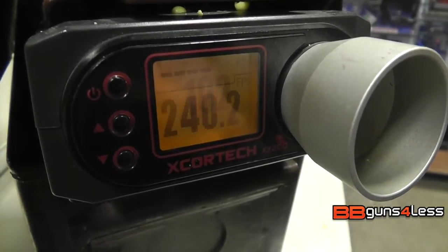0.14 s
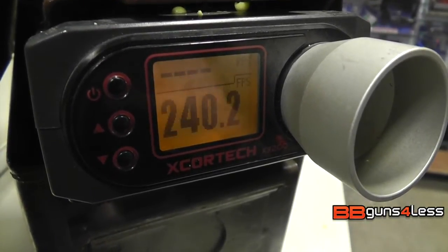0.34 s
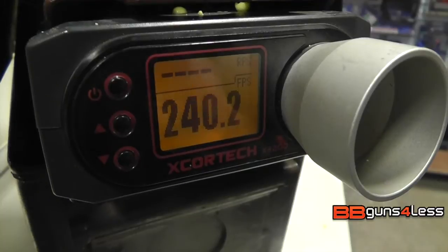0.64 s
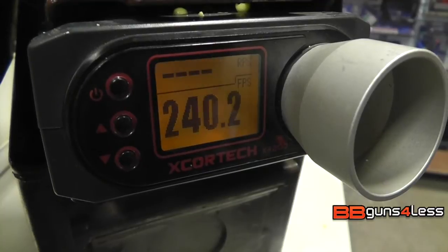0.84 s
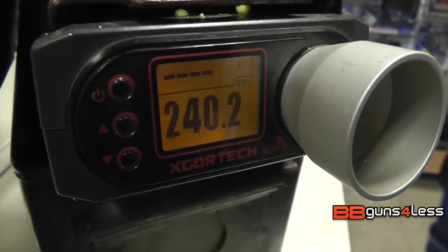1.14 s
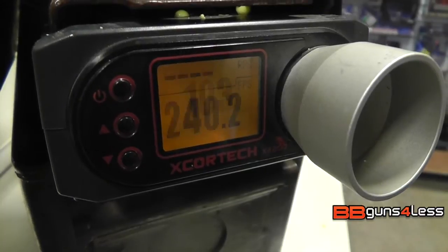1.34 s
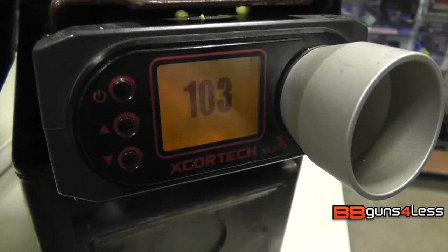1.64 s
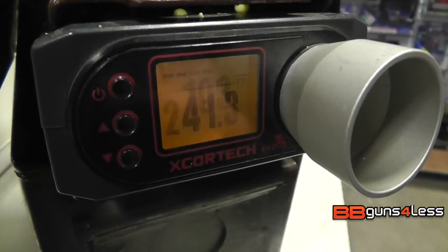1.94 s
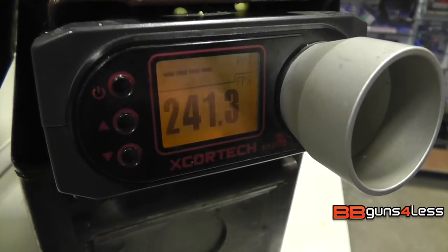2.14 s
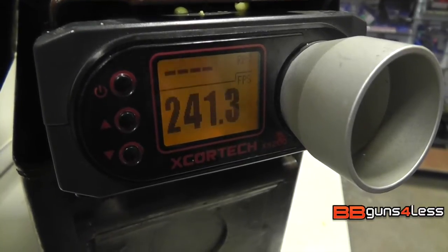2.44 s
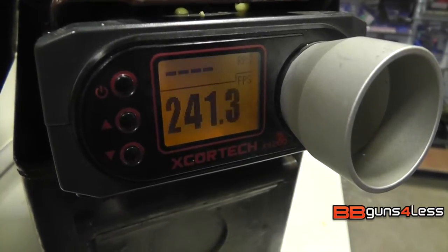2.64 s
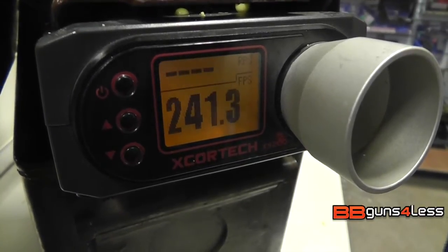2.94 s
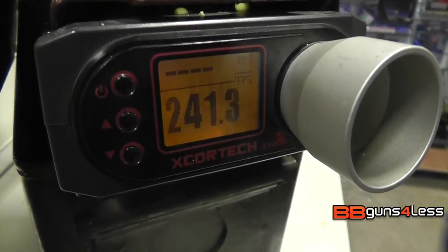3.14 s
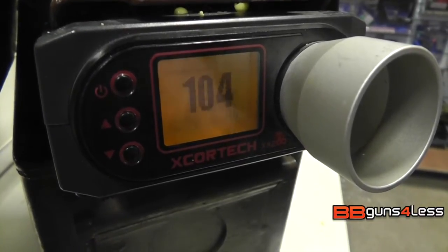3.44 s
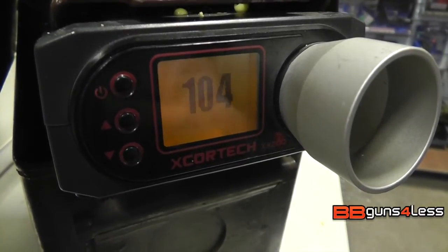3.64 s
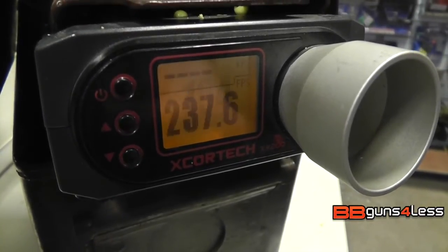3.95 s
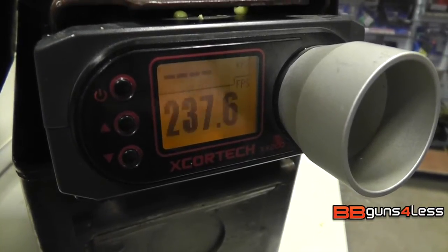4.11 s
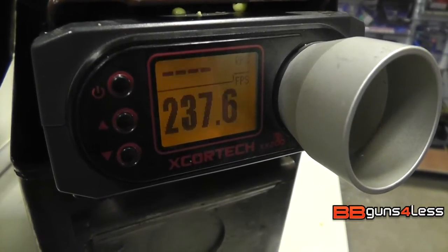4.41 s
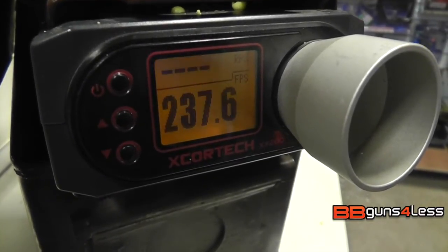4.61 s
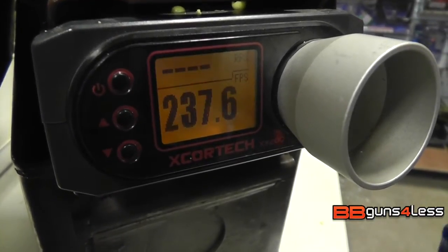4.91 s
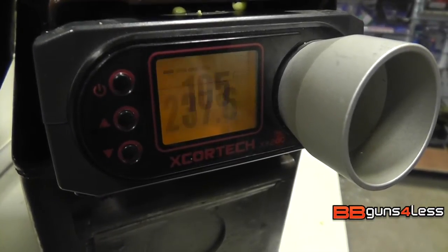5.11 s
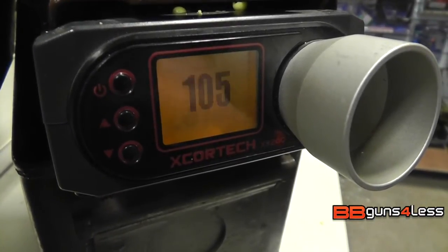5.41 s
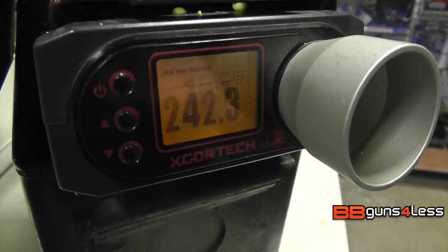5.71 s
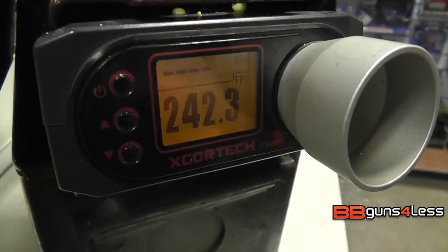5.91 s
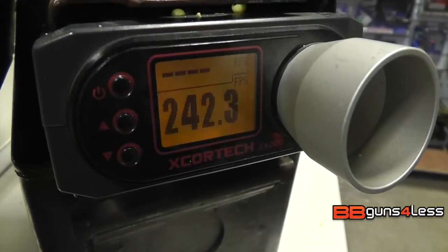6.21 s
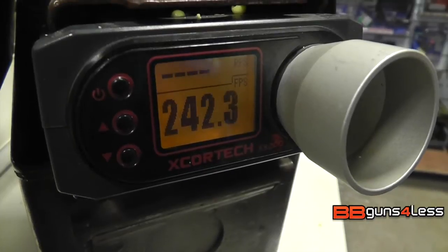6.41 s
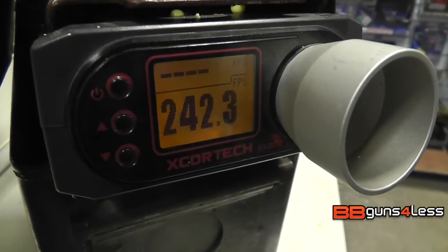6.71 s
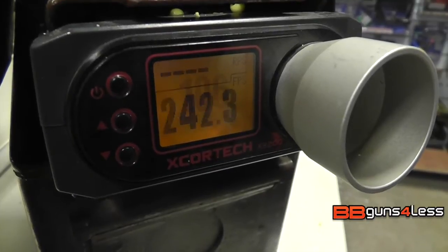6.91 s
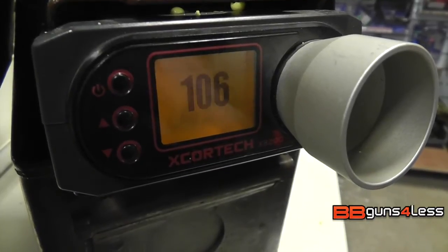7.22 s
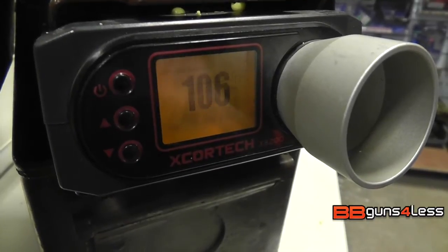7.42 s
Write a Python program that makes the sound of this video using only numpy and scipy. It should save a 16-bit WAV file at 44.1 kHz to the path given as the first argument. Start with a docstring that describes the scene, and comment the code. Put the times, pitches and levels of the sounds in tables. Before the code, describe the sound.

Four cycles of rasping slide, knock, slam and sharp air pistol crack, with small clicks, cloth rustle and faint ventilation rumble in a big room.

```python
"""Four sharp snaps of a spring air pistol, each after a rasp, a knock and a slam of its slide, in a large shop.
The pistol fires close to the microphone into a speed meter's funnel, which rings with each puff of air.
Shaped noise makes the rasps, blows and rustles; damped sines make the funnel's ring and the low thumps.
Between shots hands click on plastic and sleeves rustle; the hall answers and ventilation rumbles behind.
The recorder's gain drops at each loud blow and creeps back, uncovering the hall's tail."""
import sys
import numpy as np
from scipy import signal
from scipy.fft import rfft, irfft, next_fast_len
from scipy.io import wavfile
from scipy.ndimage import uniform_filter1d

SR = 44100
rng = np.random.default_rng(int(sys.argv[2]) if len(sys.argv) > 2 else 0)


def unload_wav(signal):
    """Save mono or channel-first audio to the path in sys.argv[1] as 16-bit WAV at rate SR, clipped to [-1, 1]."""
    wavfile.write(
        sys.argv[1],
        SR,
        np.round(np.clip(np.atleast_2d(signal).T, -1, 1) * 32767).astype(np.int16),
    )


N = 333396
TIME = np.arange(N) / SR
CATCH_GAP_S = .009  # three catches snap over in a row
AIR_DB = -54
CUTOFF_HZ = 16000

# Shots: (time [s], level [dB], air puff re level [dB])
SHOT_EVENTS = [(1.2736, 7, 0), (3.1307, 7, -2.5), (4.9472, 7.5, -5), (6.8389, 5, -12)]
# The slide unlatches: (time [s], level [dB])
UNLATCH_EVENTS = [(.213, -18), (2.0025, -30), (3.884, -34.5), (5.6874, -15.5)]
# The slide starts to rasp back towards its stop: (time [s], level [dB])
RASP_STARTS = [(.214, -28.5), (2.036, -29), (3.916, -27.5), (5.687, -29)]
# First of a run of catches as the piston engages: (time [s], level [dB])
CATCH_EVENTS = [(.2525, -21.5), (2.053, -20), (3.9332, -19), (5.722, -18)]
# The slide hits its back stop: (time [s], level [dB], pitch of the compressed spring [Hz])
STOP_EVENTS = [(.2875, -10, 2750), (2.097, -10.5, 3270), (3.958, -7.5, 2610), (5.7379, -9.5, 3190)]
# The slide slams home: (time [s], level [dB])
SLAM_EVENTS = [(0.4312, -11.5), (2.2135, -11.5), (4.102, -11), (5.8755, -11.5)]
# The hand lets go of the slide after each slam: (time [s], level [dB])
RELEASE_EVENTS = [(.796, -42), (2.585, -29), (4.4565, -31.5), (6.2265, -40.5)]
# The trigger takes up just before each shot: (time [s], level [dB])
TRIGGER_EVENTS = [(1.2432, -37), (3.104, -40), (3.115, -44), (4.928, -42), (6.821, -48.5)]
# Hard ticks, mostly of the pellet bouncing about after a shot:
# (time [s], level [dB], treble re level before an offset [dB])
TICK_EVENTS = [(1.538, -33, -19), (1.665, -37, -34), (3.2697, -21, 2), (3.382, -33, 10.5),
               (3.394, -26, -24), (3.498, -41, 5), (3.666, -29.5, 0), (6.275, -44.5, -5), (7.092, -33, 5.5),
               (7.115, -29.5, -29), (7.129, -32, -3), (7.142, -32, 6.5), (7.288, -39, -1)]
# Dull knocks of the hands on the plastic: (time [s], level [dB])
KNOCK_EVENTS = [(1.606, -43), (1.691, -52), (1.724, -43), (3.072, -43.5), (3.665, -36), (5.221, -34),
                (5.311, -31), (5.378, -36), (5.506, -33.5), (5.551, -45), (7.1675, -30), (7.416, -45)]
# Sleeves shift as the hands change grip: (time [s], half length [s], level [dB])
SLEEVE_RUSTLES = [(.058, 0.12, -45), (1.04, 0.14, -53.5), (1.88, 0.13, -47), (3.8, 0.22, -52.5),
                  (5.583, 0.054, -50.5), (6.355, .025, -54.5), (7.445, 0.042, -47)]
# Low echoes from the far walls: (delay [s], level after a shot [dB], level after a slam [dB])
WALL_ECHOES = [(.056, -32, -41.5), (0.139, -40, -65), (.202, -51, -51)]

# Funnel modes struck by the puff: (frequency [Hz], t60 [s], level [dB], right side [dB], right side lag [s])
FUNNEL_PUFF_MODES = [(338, .03, -12.5, 1.5, 0.00056), (430, 0.033, -19.5, -2, 0.0092),
                     (640, .035, -18, -1.5, 0.0059), (810, 0.027, -22, 1, 0.007),
                     (1120, .025, -14.5, -4.5, 0), (1480, 0.034, -1, 6, 0)]
# Low modes of a thump: (frequency [Hz], t60 [s], level [dB], right side [dB], right side lag [s])
LOW_THUMP_MODES = [(90, 0.017, 1.5, 0, 0.0013), (220, 0.016, -1, 1.5, 0.000084)]
# Broad resonances of the funnel: (frequency [Hz], width [Hz], level [dB])
FUNNEL_RESONANCES = [(1000, 140, 1), (1320, 330, 0), (2230, 280, 3), (2650, 160, -1.5), (3990, 150, 7),
                     (5870, 200, 7), (7800, 250, -3)]
# Resonances and hollows of the slide and body: (frequency [Hz], width [Hz], level [dB])
SLIDE_RESONANCES = [(660, 87, 0.5), (956, 64, 3), (1135, 170, 3.5), (1410, 140, 0.5), (2260, 160, 6.5),
                    (2830, 980, 5), (3300, 150, 1.5), (5420, 58, -8), (5690, 360, 5), (6380, 270, 2),
                    (7860, 200, 4.5)]
# Narrow hollows of the microphone housing: (frequency [Hz], width [Hz], level [dB])
HOUSING_HOLLOWS = [(1794, 130, -7.5), (2352, 120, -9.5), (3045, 70, -10.5)]

# Shot close by: (frequency [Hz], relative density [dB per Hz])
SHOT_NEAR_SPECTRUM = [(180, -35.5), (300, 1.5), (634, -2.5), (1390, 0.5), (1870, -7.5), (2520, 0.5),
                      (3080, -8), (4230, -6.5), (5250, -12.5), (6300, -3), (7570, -7.5), (14700, -11),
                      (16000, -8.5)]
# Shot out in the hall: (frequency [Hz], relative density [dB per Hz])
SHOT_HALL_SPECTRUM = [(120, -46), (200, -3.5), (273, -1.5), (519, -7.5), (791, -3.5), (1060, -9.5),
                      (1590, -2.5), (1770, -8), (3490, -9.5), (3830, -5), (5230, -10), (6880, 0),
                      (16000, -24.5)]
# Slide close by: (frequency [Hz], relative density [dB per Hz])
SLIDE_NEAR_SPECTRUM = [(180, -17), (300, -9.5), (701, -4.5), (842, -9.5), (1410, -1), (1780, -7.5),
                       (2140, -6.5), (2400, -12), (2700, -5.5), (3130, -7.5), (5250, -8.5), (6520, -4.5),
                       (16000, -22.5)]
# Pull and stop out in the hall: (frequency [Hz], relative density [dB per Hz])
PULL_HALL_SPECTRUM = [(240, -73.5), (400, -28), (496, -22.5), (570, -23.5), (1030, -12.5), (1510, -9),
                      (1790, -13), (2090, -7), (2750, -4), (3070, -5), (4510, -15), (6540, -9.5),
                      (16000, -25.5)]
# Slam out in the hall: (frequency [Hz], relative density [dB per Hz])
SLAM_HALL_SPECTRUM = [(240, -53.5), (400, -16.5), (553, -24.5), (626, -5), (839, -8.5), (906, 0),
                      (1270, -8), (1420, 0.5), (1790, -5), (2550, -5), (3070, -8), (6640, -5.5),
                      (16000, -16.5)]
# Cloth of the sleeves: (frequency [Hz], relative density [dB per Hz])
SLEEVE_SPECTRUM = [(150, -10.5), (350, -1.5), (1300, -6), (3000, -16), (7000, -18), (15000, -29)]
# Ventilation: (frequency [Hz], relative density [dB per Hz])
AIR_SPECTRUM = [(15, -26), (25, -14.5), (49, -8), (72, -11), (166, -4.5), (242, -9), (301, -7.5),
                (384, -15), (439, -12.5), (607, -16.5), (1330, -20), (2110, -26.5), (2280, -35),
                (3080, -33.5), (16000, -35.5)]

# Left-right likeness of close sounds: (frequency [Hz], likeness [-1..1])
NEAR_ALIKE = [(100, -0.67), (400, -0.68), (900, 0.045), (1400, -0.35), (2200, 0.58), (3300, 0.32),
              (4200, 0.79), (6600, 0.99), (7800, 0.54), (9500, 0.25), (15000, -0.31)]
# Left-right likeness of the hall: (frequency [Hz], likeness [-1..1])
HALL_ALIKE = [(250, 0.66), (600, 0.31), (1500, 0.27), (3300, 0.74), (4200, 0.87), (6600, 1), (7800, 0.3),
              (9500, -0.31), (15000, 0.21)]
# Left-right likeness of the background: (frequency [Hz], likeness [-1..1])
AIR_ALIKE = [(45, 0.97), (150, 0.5), (500, 0.13), (1200, 0.4), (2200, 0.47), (5500, 0.55), (9000, 0.62),
             (15000, .35)]
# Balance of close sounds: (frequency [Hz], left minus right [dB])
NEAR_PAN = [(300, 0), (700, 4.5), (1300, -7.5), (3000, -3), (4500, -1.5), (8000, 0.2), (11000, 2),
            (15000, -1.5)]
# Balance of the background: (frequency [Hz], left minus right [dB])
AIR_PAN = [(50, 2), (200, 4.5), (600, 1.5), (2000, -3.5), (5000, 0.5)]
# Reverberation time of the hall: (frequency [Hz], t60 [s])
HALL_DECAY = [(200, 0.75), (800, 0.74), (2500, 0.9), (6000, 0.63), (9000, 0.49), (14000, 0.2)]


def shots(near, hall, crack_s=0.0017, crack_db=-1, rattle_db=-10, ring_db=-27, hall_db=-26):
    """The air puff rings the funnel, the piston cracks home, and spring and casing rattle on briefly."""
    s, db, puff_db = np.transpose(SHOT_EVENTS)
    crack = blows(s + crack_s, db + crack_db, t60=0.011, rise=0.00052, hold=0.0039)
    rattle = blows(s, db + rattle_db, t60=0.073, rise=0.0045, hold=0.007)
    ring = blows(s, db + ring_db, t60=0.2, rise=.004, hold=0.0064)
    force = np.sqrt(crack ** 2 + rattle ** 2 + ring ** 2)
    puff = swings(FUNNEL_PUFF_MODES, zip(s, db + puff_db))
    close = colour(force * near, SHOT_NEAR_SPECTRUM, FUNNEL_RESONANCES) + puff
    return close + from_db(hall_db) * in_hall(force, SHOT_HALL_SPECTRUM, hall)


def fine_ticks(near, level_db=-46, fade_db_per_s=25, span_s=0.28, count=43):
    """Tiny bright ticks trail each shot while the loose parts settle."""
    age = span_s * rng.random((len(SHOT_EVENTS), count))
    times = np.array(SHOT_EVENTS)[:, :1] + age
    db = level_db - fade_db_per_s * age + rng.normal(0, 7.4, age.shape)
    force = blows(times.ravel(), db.ravel(), t60=.03, rise=.0005, hold=.0005, count=SR // 20)
    return force * band(near, 6000, 15500)


def slide_rub(return_s=0.0066, return_db=-11):
    """Friction grows along the pull, then swells as the slide gathers speed on its way home."""
    rub = np.zeros(N)
    for (start, rasp_db), (stop, _, _), (slam, slam_db) in zip(RASP_STARTS, STOP_EVENTS, SLAM_EVENTS):
        rub += from_db(rasp_db) * np.interp(TIME, [start, stop], [.5, 1], left=0, right=0)
        swell = np.exp(-np.minimum(abs(TIME - slam) / return_s, 20)) * (TIME < slam)
        rub += from_db(slam_db + return_db) * swell
    return rub * flutter(rate=450, depth_db=5.5)


def slide(near, hall, pull_hall_db=-15, slam_hall_db=-10):
    """The slide unlatches, rasps back over its catches to the stop, then runs forward and slams shut."""
    snaps = UNLATCH_EVENTS + [(s + k * CATCH_GAP_S, db) for s, db in CATCH_EVENTS for k in range(3)]
    catches = blows(*np.transpose(snaps), t60=0.025, rise=0.00028, hold=0.00043)
    stops = blows(*np.transpose(STOP_EVENTS)[:2], t60=0.052, rise=0.00045, hold=0.0018)
    slams = blows(*np.transpose(SLAM_EVENTS), t60=0.059, rise=0.0035, hold=0.0035)
    pull = np.sqrt(slide_rub() ** 2 + catches ** 2 + stops ** 2)
    force = np.hypot(pull, slams) * flutter(rate=1500, depth_db=2.0)
    close = colour(force * near, SLIDE_NEAR_SPECTRUM, SLIDE_RESONANCES)
    pull_hall = from_db(pull_hall_db) * in_hall(pull, PULL_HALL_SPECTRUM, hall)
    slam_hall = from_db(slam_hall_db) * in_hall(slams, SLAM_HALL_SPECTRUM, hall)
    return close + pull_hall + slam_hall


def spring(ring_db=0.0, shiver_db=-31, width_hz=300, sing_hz=2285, sing_db=-39):
    """The compressed spring shivers at each pull's own pitch after the stop, and sings thinly after the slam."""
    noise = stereo_noise(HALL_ALIKE)
    broad = from_db(shiver_db) * band(noise, 1640, 4500)
    shiver = 0
    for s, db, hz in STOP_EVENTS:
        pitched = from_db(ring_db) * band(noise, hz - width_hz / 2, hz + width_hz / 2)
        shiver = shiver + blows([s], [db], t60=0.17, rise=.003, hold=0.011) * (broad + pitched)
    sing = blows(*np.transpose(SLAM_EVENTS), t60=1.9, rise=.005, hold=.005, count=2 * SR)
    return shiver + from_db(sing_db) * sing * np.sin(2 * np.pi * sing_hz * TIME)


def thumps(soft_hz=700, apart_hz=90, alike_db=3.5, boom_db=-36):
    """Every big blow brings a heavily damped low swing; shots and slams are followed by low echoes.

    The room booms briefly after a shot."""
    events = shifted(SHOT_EVENTS, delay_s=.004, gain_db=6.5)
    events += shifted(STOP_EVENTS, delay_s=0.0024, gain_db=4.0)
    events += shifted(SLAM_EVENTS, delay_s=.0065, gain_db=3.5)
    for delay, shot_db, slam_db in WALL_ECHOES:
        events += [(s + delay, shot_db) for s, *rest in SHOT_EVENTS]
        events += [(s + delay, slam_db) for s, _ in SLAM_EVENTS]
    soften = signal.butter(2, soft_hz, fs=SR, output="sos")
    left, right = signal.sosfilt(soften, swings(LOW_THUMP_MODES, events))
    # the deepest bass reaches both sides alike
    side = signal.sosfiltfilt(signal.butter(1, apart_hz, "high", fs=SR, output="sos"), left - right)
    thump = (from_db(alike_db) * (left + right) + side * np.array([[1], [-1]])) / 2
    boom_force = blows(*np.transpose(shifted(SHOT_EVENTS, 0, boom_db)), t60=.35, rise=.01, hold=.02)
    return thump + boom_force * band(stereo_noise(AIR_ALIKE), 40, 220)


def handling(near, hall, hall_db=-15):
    """Small hard contacts; each kind has its own mix of lows, middle and treble."""
    bands = band(near, 320, 2000), band(near, 2100, 7400), band(near, 9500, 15000)

    def contacts(events, low_db, middle_db, high_db, t60):
        """One kind of contact: the same blows drive three bands of noise."""
        s, db = np.transpose(events)[:2]
        parts = zip((low_db, middle_db, high_db), bands)
        return sum(blows(s, db + part_db, t60, rise=0.00043, hold=0.00068) * noise for part_db, noise in parts)

    treble_db = np.array(TICK_EVENTS)[:, 2] + 4.5
    ticks = contacts(TICK_EVENTS, low_db=1, middle_db=5, high_db=treble_db, t60=0.04)
    knocks = contacts(KNOCK_EVENTS, low_db=13.0, middle_db=1.5, high_db=-13, t60=0.027)
    releases = contacts(RELEASE_EVENTS, low_db=6.5, middle_db=5, high_db=-9, t60=0.046)
    triggers = contacts(TRIGGER_EVENTS, low_db=19, middle_db=3, high_db=-11.5, t60=.04)
    faint = contacts(fidgets(), low_db=11.5, middle_db=6, high_db=-1.5, t60=.03)
    clicks = colour(ticks + knocks + releases + triggers + faint, [(1, 0)], SLIDE_RESONANCES)
    return clicks + from_db(hall_db) * signal.fftconvolve(clicks[:1], hall[0], axes=1)[:, :N]


def fidgets(level_db=-45, spread_db=3, after_s=.2, span_s=0.32, count=5):
    """Faint random contacts while the grip loosens after each shot: rows of (time [s], level [dB])."""
    return [(s + after_s + span_s * rng.random(), level_db + spread_db * rng.standard_normal())
            for s, *rest in SHOT_EVENTS for k in range(count)]


def sleeves(pull_s=0.032, pull_db=-41.5, squeeze_lead_s=.022, squeeze_s=0.05, squeeze_db=-53):
    """Cloth rustles at each change of grip, with each pull and as the trigger is squeezed."""
    pulls = [(catch_s - pull_s / 2, pull_s, pull_db) for catch_s, _ in CATCH_EVENTS]
    squeezes = [(s - squeeze_lead_s, squeeze_s, squeeze_db) for s, *rest in SHOT_EVENTS]
    swell = np.zeros(N)
    for at, length, db in SLEEVE_RUSTLES + pulls + squeezes:
        swell += from_db(db) * np.exp(-np.minimum(((TIME - at) / length) ** 2, 20))
    return colour(swell * flutter(rate=230, depth_db=4) * stereo_noise(HALL_ALIKE), SLEEVE_SPECTRUM)


def hall_response(build_s, uneven_db=1.8, count=SR):
    """Dense reflections that build up, then decay at a rate that depends on frequency."""
    t = np.arange(count) / SR
    hz = np.fft.rfftfreq(count, 1 / SR)
    noise = rfft(stereo_noise(HALL_ALIKE, count=count))
    centres = np.array(HALL_DECAY)[:, 0]
    response = 0
    # each row of shares picks one band that fades into its neighbours
    for share, (_, t60) in zip(np.eye(len(centres)), HALL_DECAY):
        band_noise = irfft(noise * at_hz(np.c_[centres, share], hz), count)
        response = response + band_noise * np.exp(-np.log(1000) * t / t60)
    response = response * (1 - np.exp(-t / build_s)) * flutter(rate=110, depth_db=uneven_db)[:count]
    return response / np.sqrt(np.sum(response ** 2) / 2)


def in_hall(force, spectrum, hall):
    """A noisy blow radiates in several directions; each comes back through its own reflections."""
    back = 0
    for path in hall:
        back = back + signal.oaconvolve(force * rng.standard_normal((1, N)), path, axes=1)[:, :N]
    return colour(back / np.sqrt(len(hall)), spectrum)


def shop_air():
    """Ventilation rumble: steady coloured noise with a few resonances and a hollow."""
    resonances = [(20, 18, -9.5), (162, 6.9, 1.5), (2560, 430, 12)]  # (Hz, width Hz, dB)
    return from_db(AIR_DB) * colour(stereo_noise(AIR_ALIKE, AIR_PAN), AIR_SPECTRUM, resonances)


def blows(times, levels_db, t60, rise, hold, count=SR // 3):
    """Force of contacts: each rises, holds while the parts chatter, and dies away (all in s)."""
    power = np.zeros(N + count)
    t = np.arange(count) / SR
    for s, db in zip(times, levels_db):
        decay_db = 60 * np.maximum(t - rise - hold, 0) / t60
        shape = np.minimum(t / rise, 1) * from_db(db - decay_db)
        power[int(s * SR):int(s * SR) + count] += shape ** 2
    return np.sqrt(power[:N])


def swings(modes, events, count=SR // 10):
    """Damped modes struck at each event; they push the two sides in opposite directions."""
    out = np.zeros((2, N))
    t = np.arange(count) / SR

    def swing(hz, t60, age):
        """One damped sine."""
        return np.sin(2 * np.pi * hz * age) * np.exp(-np.log(1000) * age / t60)

    shape = np.zeros((2, count))
    for hz, t60, db, right_db, lag in modes:
        left = swing(hz, t60, t)
        right = -from_db(right_db) * swing(hz, t60, np.maximum(t - lag, 0))
        shape += from_db(db) * np.array([left, right])
    for s, db in events:
        out[:, int(s * SR):int(s * SR) + count] += from_db(db) * shape
    return out


def shifted(events, delay_s, gain_db):
    """The same events a little later, at another level."""
    return [(s + delay_s, db + gain_db) for s, db, *rest in events]


def flutter(rate, depth_db):
    """A gain that wanders at random between knots, rate of them a second."""
    knots = rng.standard_normal(N // 20)
    return from_db(depth_db * np.interp(TIME * rate, np.arange(len(knots)), knots))


def stereo_noise(likeness, balance=((1, 0),), count=N):
    """White noise whose likeness and balance between the sides depend on frequency."""
    size = next_fast_len(count, True)
    hz = np.fft.rfftfreq(size, 1 / SR)
    mid, side = rfft(rng.standard_normal((2, size)))
    alike = np.clip(at_hz(likeness, hz), -1, 1)
    sides = np.array([[1], [-1]])
    pan = from_db(sides * at_hz(balance, hz) / 2)
    both = np.sqrt(1 + alike) * mid + sides * np.sqrt(1 - alike) * side
    return irfft(both * pan / np.linalg.norm(pan, axis=0), size)[:, :count]


def colour(x, spectrum, resonances=(), size=4096):
    """Causal filter of unit power with a broad spectrum and ringing resonances."""
    hz = np.fft.rfftfreq(size, 1 / SR)
    gain = from_db(np.maximum(at_hz(spectrum, hz), -70) + bumps_db(resonances, hz))
    # folding the cepstrum forward in time gives minimum phase
    cepstrum = irfft(np.log(gain))
    response = irfft(np.exp(rfft(cepstrum * (1 + np.sign(np.fft.fftfreq(size))))))
    return signal.oaconvolve(x, response[None] / np.linalg.norm(response), axes=1)[:, :N]


def bumps_db(resonances, hz):
    """Summed bell curves of resonances and hollows."""
    return sum(db / (1 + (2 * (hz - centre) / width) ** 2) for centre, width, db in resonances)


def band(x, low_hz, high_hz):
    """Butterworth band-pass."""
    return signal.sosfilt(signal.butter(2, [low_hz, high_hz], "band", fs=SR, output="sos"), x)


def at_hz(points, hz):
    """Read a table on a log-frequency axis."""
    points = np.array(points)
    return np.interp(np.log(np.maximum(hz, 1)), np.log(points[:, 0]), points[:, 1])


def from_db(db):
    """Decibels to gain."""
    return 10 ** (np.asarray(db) / 20)


def scene():
    """Gun and hands near the microphone, the shop around them."""
    near = stereo_noise(NEAR_ALIKE, NEAR_PAN)
    hall = [hall_response(build_s=0.0021) for path in range(3)]
    gun = shots(near, hall) + fine_ticks(near) + slide(near, hall) + spring() + thumps()
    return gun + handling(near, hall) + sleeves() + shop_air()


def gain_control(x, threshold_db=-16, slope=0.57, release_db_per_s=65, size=110):
    """The gain drops at once on a loud blow and creeps back at a steady rate."""
    power = uniform_filter1d(np.mean(x ** 2, axis=0), size)
    level_db = 10 * np.log10(np.maximum(power, 1e-12))
    cut_db = slope * np.maximum(level_db - threshold_db, 0)
    recovery_db = release_db_per_s * TIME
    held_db = np.maximum.accumulate(cut_db + recovery_db) - recovery_db
    return x * from_db(-uniform_filter1d(held_db, size))


def record(dry):
    """The microphone housing cuts narrow hollows; gain control, rounded peaks and the top cut follow."""
    held = gain_control(colour(dry, [(1, 0)], HOUSING_HOLLOWS))
    top_cut = signal.ellip(10, .3, 80, CUTOFF_HZ, fs=SR, output="sos")
    return signal.sosfilt(top_cut, np.tanh(held))


dry = scene()
out = record(dry)
unload_wav(out)
```